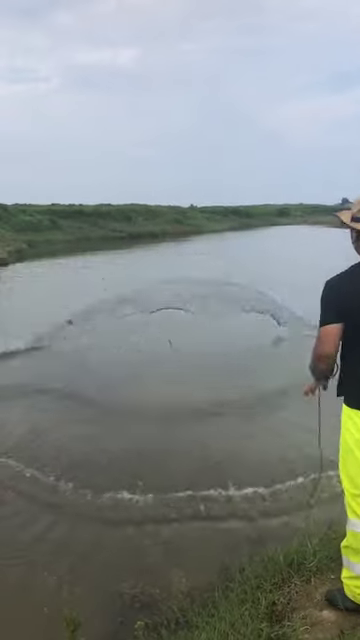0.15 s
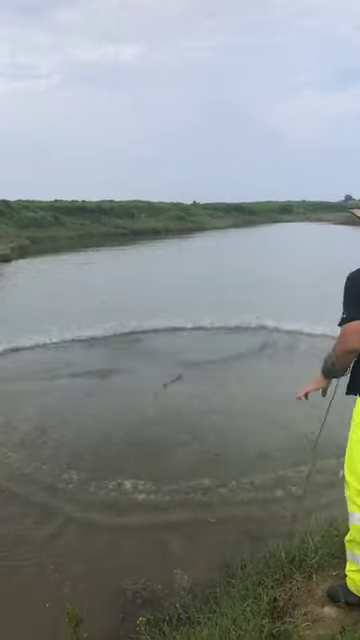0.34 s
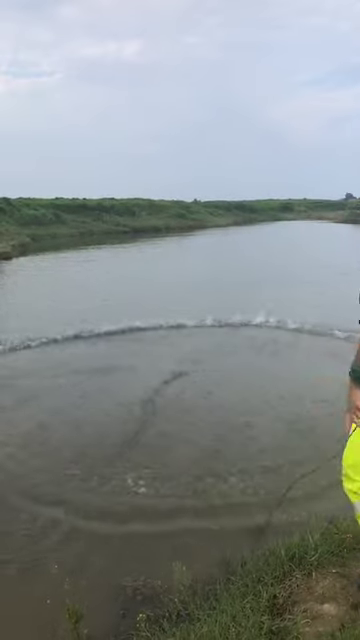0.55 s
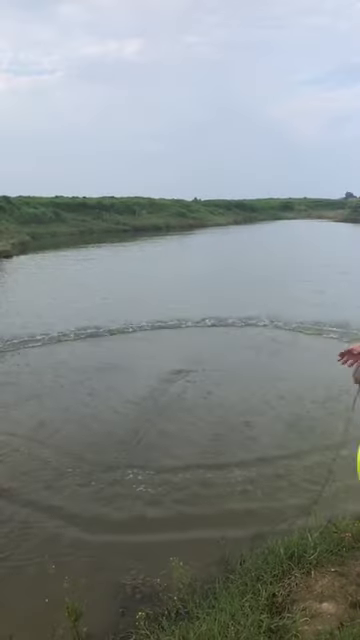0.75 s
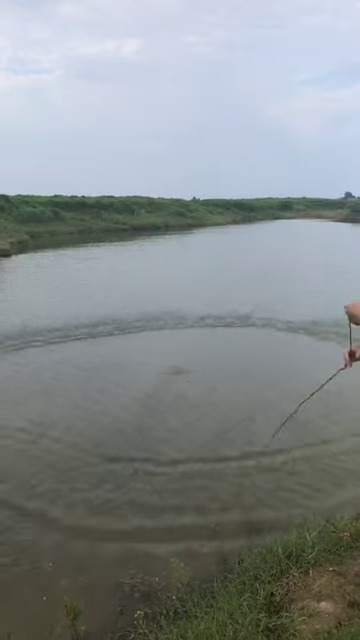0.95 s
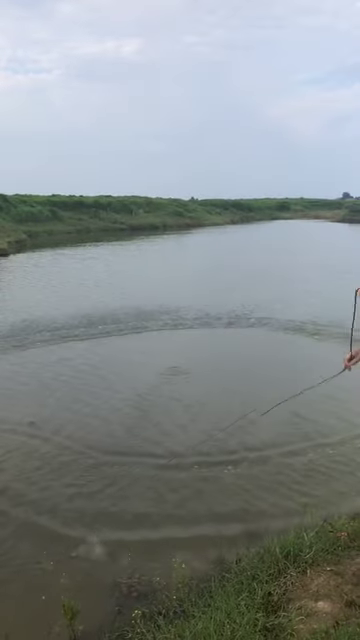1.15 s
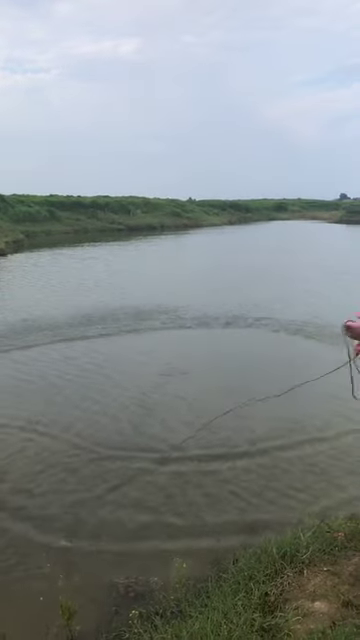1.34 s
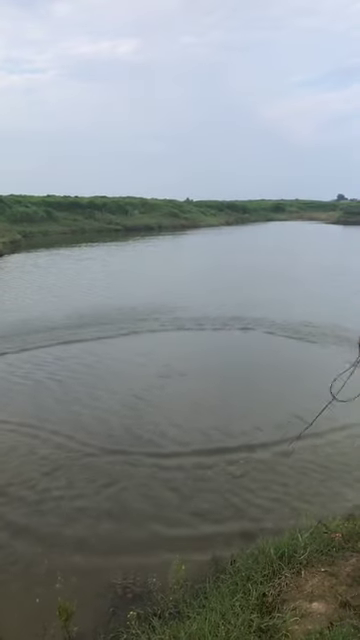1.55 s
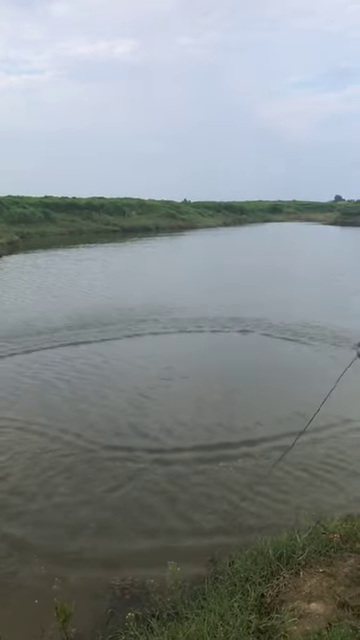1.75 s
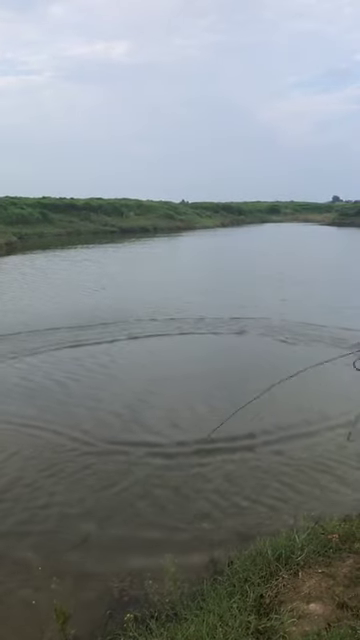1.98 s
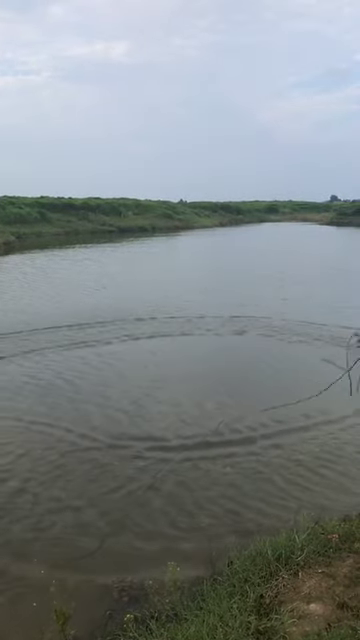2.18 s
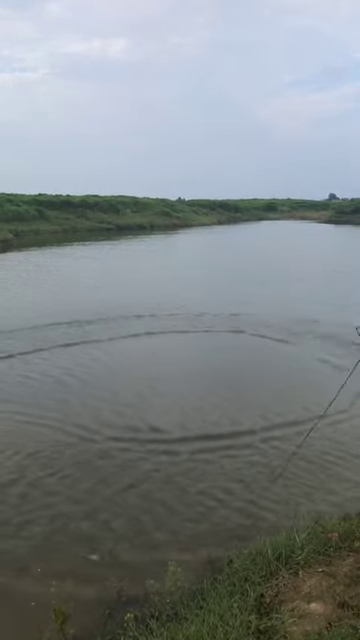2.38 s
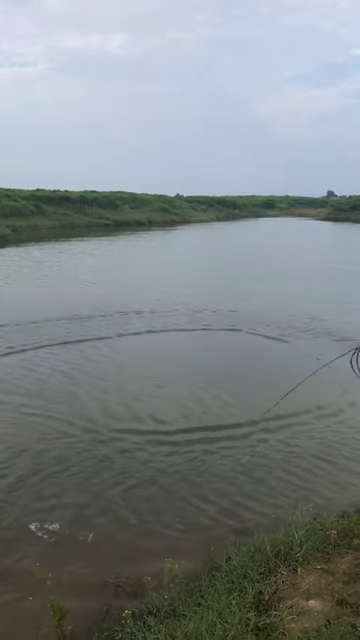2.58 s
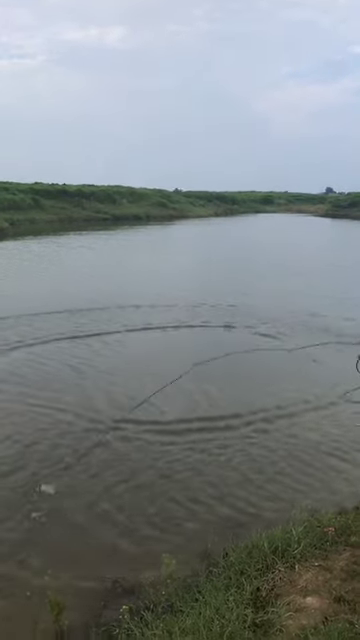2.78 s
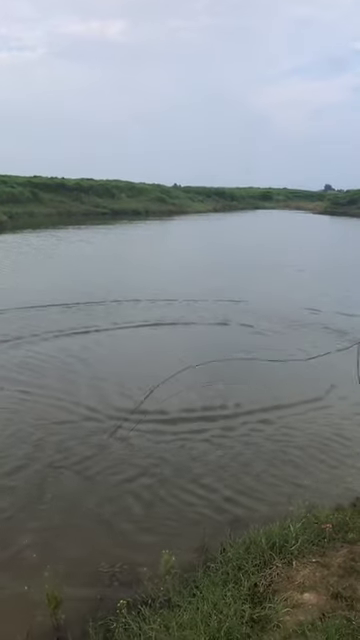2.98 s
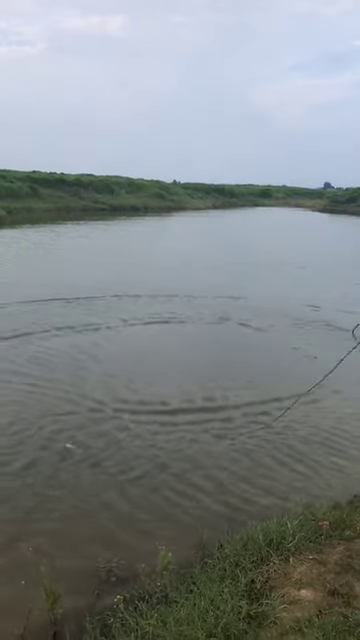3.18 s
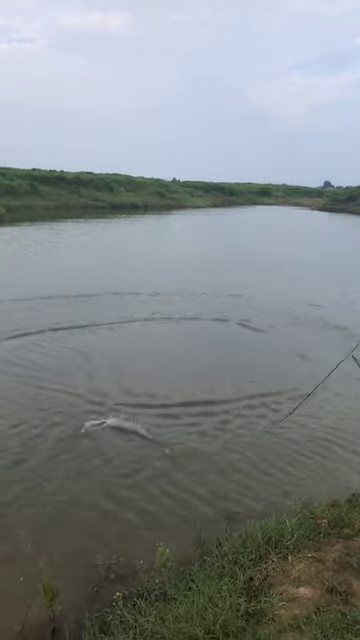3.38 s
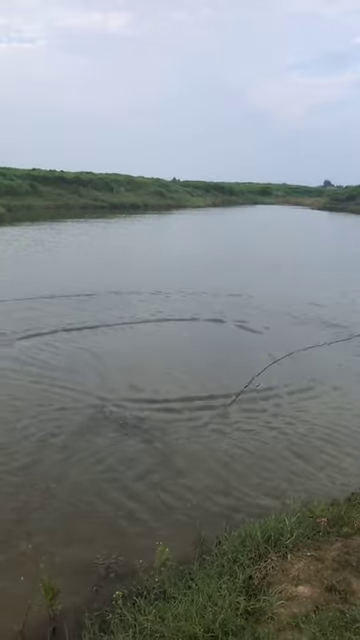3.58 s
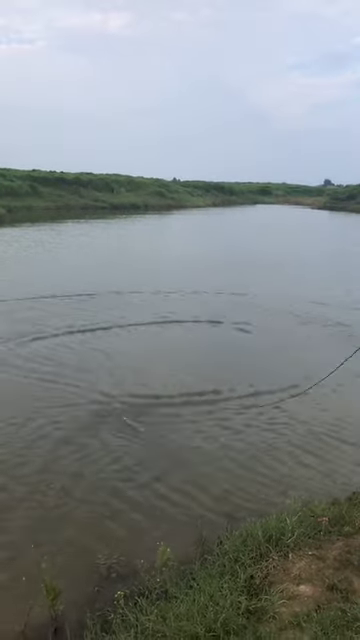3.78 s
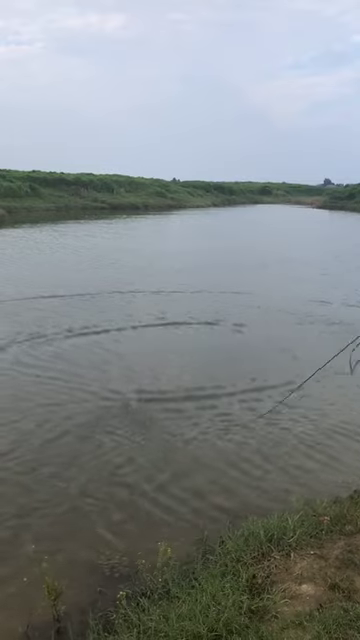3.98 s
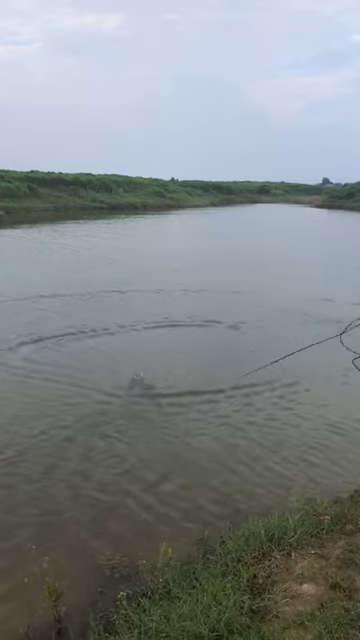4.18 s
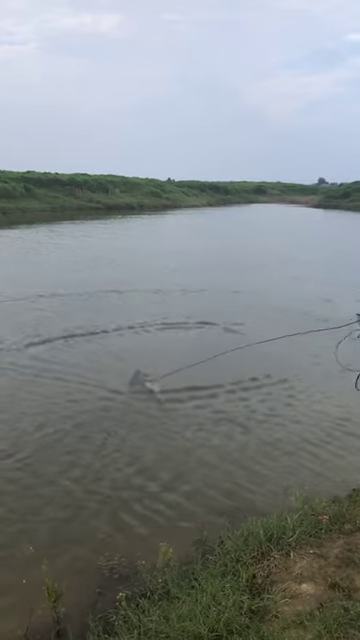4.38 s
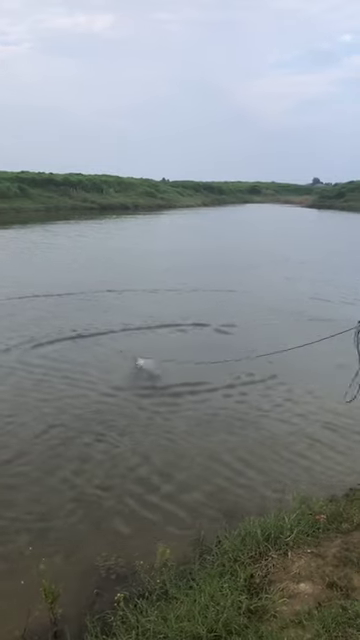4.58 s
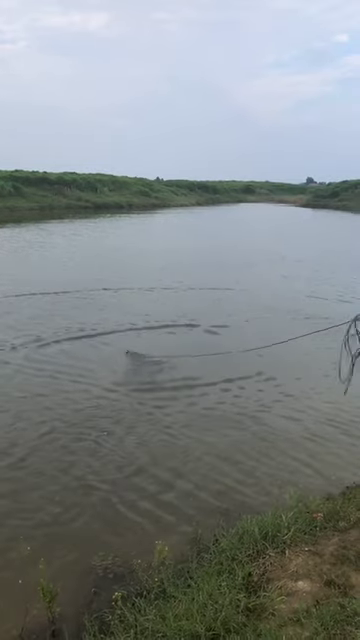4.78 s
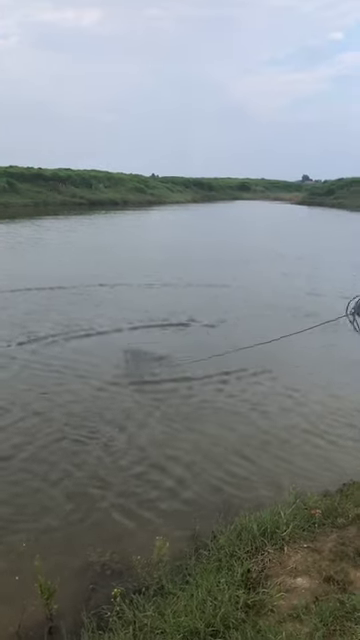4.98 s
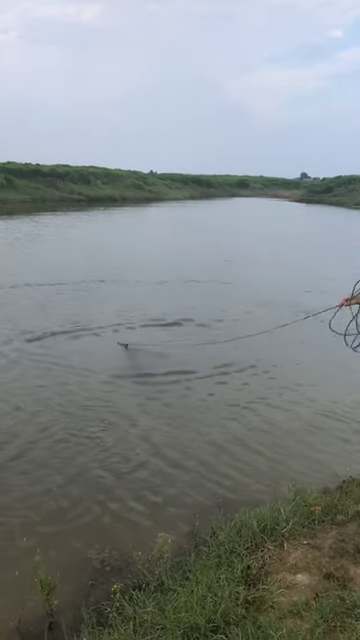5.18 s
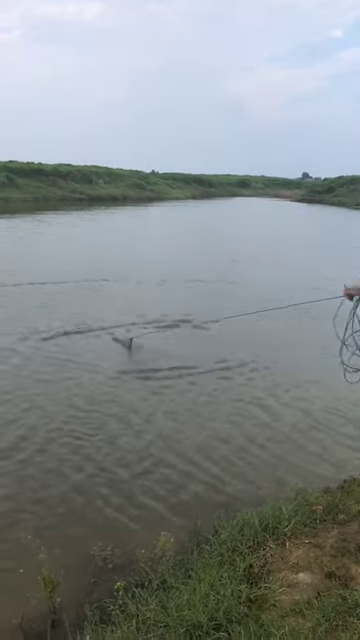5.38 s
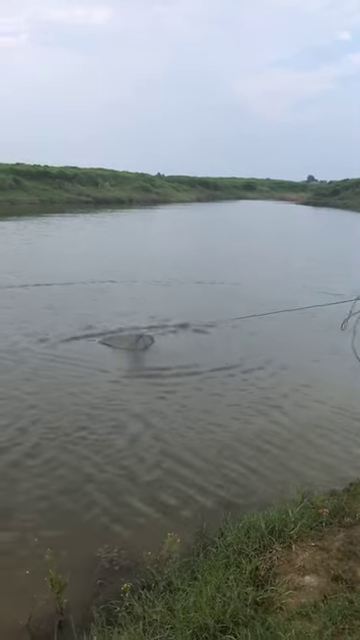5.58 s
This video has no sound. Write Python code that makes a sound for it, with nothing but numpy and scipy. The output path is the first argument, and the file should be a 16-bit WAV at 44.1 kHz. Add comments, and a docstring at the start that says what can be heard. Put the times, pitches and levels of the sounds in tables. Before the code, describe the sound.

Close on a pond bank, a weighted net lands at once with a loud, ragged splash of low gulps and hissing spray. Droplets patter back and fade within about a second and a half. Then the wet line is hauled in with brief swishes, slaps and rising drip plinks, and a small metal part clinks near the end. A bird chips, a cricket trills, and light wind buffets the microphone.

```python
"""A weighted cast net smacks onto a pond: its sinkers drag air under in gulps, and spray hisses and patters back.
The hand line is then hauled in, swishing, slapping and dripping, and a small metal part clinks once.
A bird chips, a cricket trills on the bank, and a light wind buffets the microphone throughout.
Water is made of decaying bubble tones and coloured noise, metal of damped modes, the bird and the
cricket of gliding sines, and wind of low noise with single eddies."""
import sys
import numpy as np
from scipy import signal
from scipy.fft import rfft, irfft, next_fast_len
from scipy.io import wavfile
from scipy.ndimage import map_coordinates

SR = 44100
rng = np.random.default_rng(int(sys.argv[2]) if len(sys.argv) > 2 else 0)


def write(x):
    x = np.atleast_2d(x).T
    wavfile.write(sys.argv[1], SR, np.round(np.clip(x, -1, 1) * 32767).astype(np.int16))


N = 248525

# All table levels are relative: each layer has a gain of its own.
# bunches of sinkers that smack in and gulp air: t/s, level/dB, starting f/Hz
SINKERS = [(.040, -6, 783), (.049, -9.5, 520), (.149, -7.5, 776), (.177, -12, 322), (.2208, -8, 703),
           (.238, -10, 365), (.283, -7.5, 850), (.329, -10.5, 370), (.368, -8.5, 462), (.389, -8.5, 520),
           (.432, -5, 690), (.444, -8, 554), (.456, -10.5, 268)]
# pulls that drag the wet line and the net's crown through the surface:
# start t/s, length t/s, wash level/dB, spray level/dB
PULLS = [(1.82, .06, -50.5, -55.5), (2.665, .05, -41.5, -48), (2.79, .13, -50.5, -56),
         (3.228, .03, -43, -50), (3.345, .06, -43, -58), (3.435, .03, -38.5, -39), (3.5, .05, -38.5, -45),
         (3.61, .06, -38, -48.5), (3.78, .02, -50, -56), (3.96, .14, -53, -57), (4.235, .08, -44.5, -50.5),
         (4.66, .09, -45.5, -63), (4.85, .08, -45.5, -52.5), (5.14, .1, -47, -65), (5.54, .04, -50, -54)]
# spectrum of trickling water: f/Hz, level/dB
TRICKLE_TONE = [(300, -20), (600, -4.5), (1500, -1), (2700, -0.5), (5000, -3), (7000, -10), (10000, -19)]


def splash():
    """Air-cavity resonance: sinkers drag air under in low gulps; spray falls back as small bubbles and mist."""
    # spectra of the churn, the drops and the mist: f/Hz, level/dB
    plunge_tone = [(150, -32), (215, -10), (270, 1), (400, -2), (700, -2.5), (1000, -10.5), (1600, -28),
                   (3000, -60)]
    drop_tone = [(200, -20), (350, -8), (550, -2.5), (750, 2.5), (1200, -2), (1700, -3), (2200, -6),
                 (4000, -10.5), (5500, -16.5), (9000, -40)]
    mist_tone = [(2000, -19), (4000, -1.5), (5500, -1.5), (8000, -5), (9500, -7), (12000, -7),
                 (15500, -4.5)]
    churn_level, drop_level, mist_level = splash_levels()

    pockets = froth(rate=600, low_hz=252.4, high_hz=1200, cycles=20, glide=-0.046, spread_db=1.5,
                    size=2 * SR // 3)
    churn = coloured(pockets, plunge_tone)

    small = froth(rate=2800, low_hz=1204, high_hz=7040, cycles=18, glide=0.15, spread_db=2.5,
                  size=3 * SR // 2)
    large = froth(rate=450, low_hz=378, high_hz=1407, cycles=30.3, glide=0.26, spread_db=1.5, size=SR)
    patter = coloured(small + 0.39 * large + 0.86 * rng.standard_normal(N), drop_tone)

    beads = froth(rate=4000, low_hz=3000, high_hz=15300, cycles=5.8, glide=0.1, spread_db=3.0, size=2 * SR)
    hiss = coloured(beads + 0.89 * rng.standard_normal(N), mist_tone)

    gulps = np.zeros(N)
    t = np.arange(SR // 8) / SR
    for s, db, hz in SINKERS:
        add(gulps, s, amp(db) * bubble(t, hz, cycles=30.7, glide=-0.11, onset=0.88))
    smacks = bursts(smack_rows(), drop_tone, t60=0.025, attack=0.0003)

    water = churn_level * churn + drop_level * patter + mist_level * hiss
    return water + amp(3.5) * gulps + amp(-7) * smacks


def splash_levels():
    """Growth and decay of churn, drops and mist: the landing builds, its spray falls back, the foam dies away."""
    landed_s, mesh_s = 0.445, 0.365  # the main landing ends; the mesh hits the water
    fallback_s, fallback_end_s = 0.65, 0.96
    foam_flicker_db = 1.6  # foam bursts in uneven clusters
    bunches = surges(smack_rows(), t60=0.11, attack=0.004)
    landing = held(0, landed_s, rise_db_per_s=0, fall_db_per_s=260, drift_db_per_s=8)
    thrown = held(0, landed_s, rise_db_per_s=0, fall_db_per_s=75, drift_db_per_s=8)
    fallback = held(fallback_s, fallback_end_s, rise_db_per_s=40, fall_db_per_s=66, drift_db_per_s=-15)
    foam = held(fallback_end_s, 1.5, rise_db_per_s=100, fall_db_per_s=80, drift_db_per_s=-6)
    foam = foam * amp(foam_flicker_db * wobble(35))
    mesh = swell(mesh_s, 0.05)
    fine_thrown = held(0.14, mesh_s, rise_db_per_s=24, fall_db_per_s=40, drift_db_per_s=-2)
    fine_fallback = held(fallback_s, fallback_end_s, rise_db_per_s=90, fall_db_per_s=120,
                         drift_db_per_s=-19)

    churn = amp(-23) * landing + amp(-17.5) * bunches
    # the parts of drops and of mist add by power
    drop_parts = [amp(-22.5) * thrown, amp(-13.5) * bunches, amp(-22.7) * fallback, amp(-45) * foam]
    mist_parts = [amp(-26.5) * fine_thrown, amp(-20.5) * mesh, amp(-30.5) * fine_fallback, amp(-43.5) * foam]
    return churn, np.linalg.norm(drop_parts, axis=0), np.linalg.norm(mist_parts, axis=0)


def smack_rows(reference_hz=700, db_per_octave=4):
    """Impact strength as rows (t/s, level/dB): a tighter bunch gulps higher and smacks harder."""
    return [(s, db + db_per_octave * np.log2(hz / reference_hz)) for s, db, hz in SINKERS]


def hand_line():
    """Surface entrainment: pulls wash up small bubbles and spray over lapping ripples; the coiled rope slaps."""
    # ripples lapping along the bank: t/s, level/dB
    lapping_rows = [(1.1, -44), (1.6, -51), (1.97, -45), (2.45, -53), (3.0, -50), (3.6, -47), (3.9, -51),
                    (4.45, -53), (5.05, -48.5), (5.64, -49)]
    # slaps of the rope as it is coiled: t/s, level/dB
    slap_rows = [(3.0873, -29), (3.0905, -16), (3.0935, -24), (3.844, -23), (3.848, -29), (4.205, -41),
                 (4.792, -25.5), (5.318, -24.5)]
    # spectra of a slap and of the fine spray: f/Hz, level/dB
    slap_tone = [(150, -21), (350, -4.5), (900, -4), (1450, -1), (2000, -7), (2800, -4.5), (4000, -14),
                 (8000, -21.5), (15000, -30)]
    fizz_tone = [(3000, -6), (6000, 0), (9000, -1.5), (12000, 0.5), (15500, 1)]

    lapping, = gains(lapping_rows)
    wash, spray = np.zeros((2, N))
    for start, length, wash_db, spray_db in PULLS:
        drag = held(start, start + length, rise_db_per_s=380, fall_db_per_s=230)
        wash = np.maximum(wash, amp(wash_db) * drag)
        spray = np.maximum(spray, amp(spray_db) * drag)

    plinks = froth(rate=170, low_hz=1202, high_hz=6030, cycles=51, glide=0.2, spread_db=4)
    trickle = froth(rate=700, low_hz=696, high_hz=6500, cycles=20, glide=0.26, spread_db=3.5)
    water = coloured(trickle + 0.82 * plinks + 1.1 * rng.standard_normal(N), TRICKLE_TONE)
    ripples = coloured(trickle + 0.3 * plinks + 2.35 * rng.standard_normal(N), TRICKLE_TONE)
    beads = froth(rate=600, low_hz=4000, high_hz=15000, cycles=22, glide=0.1, spread_db=4)
    fizz = coloured(beads + 1.16 * rng.standard_normal(N), fizz_tone)

    sputter = amp(2.4 * wobble(100))
    pulled = sputter * (amp(-2.5) * wash * water + amp(1.5) * spray * fizz)
    slaps = bursts(slap_rows, slap_tone, t60=0.019, attack=0.00085)
    return pulled + amp(-3.7) * lapping * ripples + amp(-1.5) * slaps


def drips():
    """Bubble resonance: a drop ticks and traps a bubble of rising pitch; one large pocket gurgles upward."""
    # single distinct drops off the line: t/s, level/dB, starting f/Hz
    single_drops = [(1.117, -27, 780), (1.162, -28, 1290), (1.823, -32, 810), (2.652, -23.5, 1700),
                    (2.710, -17, 2040), (2.795, -23, 1330), (2.841, -24.5, 3760), (2.930, -25, 1900),
                    (3.336, -28, 1550), (3.383, -27, 2500), (3.481, -22, 3490), (3.509, -17.5, 3680),
                    (3.545, -22, 2530), (3.603, -23, 3150), (3.623, -20.5, 2140), (3.652, -23, 1440),
                    (3.683, -23.5, 3540), (3.974, -26.5, 2630), (4.055, -31, 5160), (4.241, -21.5, 3650),
                    (4.287, -23, 5400), (4.324, -25, 2570), (4.640, -23.5, 2460), (4.733, -26, 2380),
                    (4.865, -25, 2600), (4.931, -22.5, 3200)]
    out = np.zeros(N)
    t = np.arange(SR // 10) / SR
    drops = single_drops + small_drops()
    for s, db, hz in drops:
        add(out, s, amp(db) * bubble(t, hz, cycles=40, glide=0.24, onset=1.74))

    # the pocket wobbles, and its pitch climbs ever faster as it nears the surface
    rise = np.linspace(0, 1, num=SR // 14)
    pitch = 620 + 1400 * rise ** 2 + 70 * wobble(347)[:len(rise)]
    arch = np.sqrt(np.sin(np.pi * rise).clip(0))
    level = amp(-35.5 - 7 * rise + 3.3 * wobble(200)[:len(rise)]) * arch
    add(out, 3.648, level * np.sin(2 * np.pi * np.cumsum(pitch) / SR))

    ticks = bursts(drops, TRICKLE_TONE, t60=0.034, attack=0.001)
    return amp(4.0) * out + amp(-15) * ticks


def small_drops():
    """Random shedding as rows (t/s, level/dB, f/Hz): a pull with a louder wash sheds louder drops."""
    drips_per_s, after_s = 70, 0.03  # shed during each drag and for a moment after it
    centre_hz, spread_octaves = 2900, 0.65
    over_wash_db, scatter_db = 11, 1.5
    rows = []
    for start, length, wash_db, _ in PULLS:
        span = length + after_s
        when = rng.random(size=64)
        strength, size = rng.standard_normal(size=64), rng.standard_normal(size=64)
        db = wash_db + over_wash_db + scatter_db * strength
        hz = centre_hz * 2 ** (spread_octaves * np.clip(size, -2, 1))
        rows += list(zip(start + span * when, db, hz))[:round(drips_per_s * span)]
    return rows


def clink():
    """Modal vibration: a small metal part is struck, rings in damped modes and rattles to rest."""
    # modes of the part: f/Hz, level/dB, 60 dB decay t/s
    modes = [(2400, -18, 0.04), (4592, -24, 0.1), (7120, -0.5, 0.06), (7542, -15, 0.07), (9868, -19, 0.01),
             (15130, -19, .06)]
    # its contacts: t/s, ring level/dB, click level/dB
    contacts = [(5.343, -15, -17), (5.3555, -33, -25), (5.360, -36, -28), (5.368, -31, -26),
                (5.3717, -42.5, -33)]
    # spectrum of the rattle: f/Hz, level/dB
    rattle_tone = [(500, -20), (1400, -6), (2300, 2), (3500, -10), (4700, -3), (7000, -1), (8500, -1),
                   (9800, 3.5), (11200, -6), (13200, -7), (15400, 5.5)]
    out = np.zeros(N)
    t = np.arange(SR // 5) / SR
    ring = sum(amp(db - 60 * t / t60) * np.sin(2 * np.pi * hz * t) for hz, db, t60 in modes)
    for s, ring_db, _ in contacts:
        add(out, s, amp(ring_db) * ring * (1 - np.exp(-t / 0.0014)))
    clicks = [(s, click_db) for s, _, click_db in contacts]
    rattle = bursts(clicks, rattle_tone, t60=0.04, attack=0.0004)
    return amp(2.5) * out + amp(0.5) * rattle


def birds():
    """Frequency modulation: one bird repeats a sharp upward chip; a far one whistles once."""
    # chips: t/s, level/dB
    chip_rows = [(1.1465, -29), (1.359, -23.5), (1.834, -25.5), (2.0484, -27), (2.4543, -25),
                 (2.665, -28.5), (3.075, -26), (3.297, -24), (3.753, -25), (3.969, -24.5), (4.3732, -23.5),
                 (4.596, -20.5), (4.937, -27.5), (5.147, -25.5), (5.557, -22)]
    # contours of the two calls: t/s, f/Hz, level/dB
    chip = [(0, 5200, -18), (.001, 7530, -2), (.003, 7180, -4), (.005, 7850, -2), (.009, 8300, -9),
            (.013, 8950, -24.5), (.016, 9000, -47.5)]
    whistle = [(0, 3700, -15), (.02, 4050, 0), (.045, 4400, 1), (.065, 4480, -3), (.08, 4350, -22)]
    out = np.zeros(N)

    def note(shape, rough):
        """A sine follows the contour, with an unsteady pitch and level."""
        s, hz, db = np.transpose(shape)
        t = np.arange(0, s[-1], 1 / SR)
        quaver = rough * np.interp(t, np.linspace(0, s[-1], num=14), rng.standard_normal(size=14))
        pitch = np.interp(t, s, hz) * (rng.normal(1, 0.012) + 0.026 * quaver)
        return amp(np.interp(t, s, db) + 2.2 * quaver) * np.sin(2 * np.pi * np.cumsum(pitch) / SR)

    for s, db in chip_rows:
        add(out, s, amp(db) * note(chip, rough=1))
    add(out, 2.185, amp(-47) * note(whistle, rough=0.25))
    return out


def insects(stroke_hz=29.8, pitch_hz=6380):
    """Stridulation: each wing stroke swells and sags in pitch; more insects shimmer far off as noise."""
    # cricket trills: start t/s, end t/s, level/dB
    trill_rows = [(1.38, 2.21, -55), (2.43, 3.15, -56.5), (3.42, 4.93, -52), (5.085, 5.19, -52),
                  (5.47, 5.57, -52)]
    # spectrum of the far insects: f/Hz, level/dB
    insect_tone = [(4000, -28), (5800, -10), (6700, -1), (7150, -5.5), (7650, -4), (8200, -13), (9500, -28)]
    t = np.arange(N) / SR
    stroke = (t * stroke_hz + 0.15 * wobble(3)) % 1  # position within the stroke, 0 to 1
    pitch = pitch_hz * (1 - 0.055 * (stroke - 0.5) + 0.0202 * wobble(1200))
    level = sum(amp(db) * np.clip(np.minimum(t - start, end - t) / 0.0092, 0, 1)
                for start, end, db in trill_rows)
    strokes = amp(1.9 * wobble(20)) * np.sin(np.pi * stroke) ** 2
    trill = level * unit(strokes * np.sin(2 * np.pi * np.cumsum(pitch) / SR))
    shimmer = amp(-57.5 + 1.7 * wobble(2) + 2.1 * wobble(60)) * noise(insect_tone)
    return amp(-3.5 + wobble(4.16)) * trill + shimmer


def wind():
    """Turbulent pressure: lumpy buffeting swells in gusts around single eddies, over the soft rush of open air."""
    # breeze on the microphone: t/s, level/dB
    breeze_rows = [(0.0, -40), (0.67, -42), (1.21, -40), (1.33, -37), (1.9, -36), (2.65, -38), (2.86, -43),
                   (3.04, -43), (3.37, -41), (3.97, -43), (4.25, -38), (4.6, -42), (5.51, -42), (5.64, -41)]
    # short gusts with an eddy at the heart of each: t/s, eddy level/dB, eddy f/Hz
    gust_rows = [(.561, -26, 90), (1.246, -24.5, 89), (1.456, -21, 70), (1.626, -20, 65), (2.421, -23, 100),
                 (2.509, -20.5, 71), (3.286, -20, 150), (3.354, -18, 65), (3.55, -26, 70), (3.70, -26, 70),
                 (4.346, -25, 65), (4.887, -20, 120), (5.431, -19.5, 109)]
    # spectra of the buffeting and of the open air: f/Hz, level/dB
    wind_tone = [(20, -34), (32, -13.5), (48, 0), (75, -1.5), (110, -5.5), (170, -12), (260, -19),
                 (500, -29.5), (1200, -39.5), (4000, -80)]
    air_tone = [(100, -10), (300, 0.5), (600, -3), (1200, -5.5), (2500, -17.5), (5000, -16.5), (10000, -17),
                (15500, -17)]
    gust_s, gust_under_eddy_db = 0.085, -10
    breeze, = gains(breeze_rows)
    buffet = amp(2) * breeze
    eddies = np.zeros(N)
    t = np.arange(SR // 10) / SR - 0.05  # time from the middle of the eddy
    for s, db, hz in gust_rows:
        buffet = np.maximum(buffet, amp(db + gust_under_eddy_db) * swell(s, gust_s))
        add(eddies, s + t[0], -amp(db) * np.sin(2 * np.pi * hz * t) * np.exp(-(t * hz / 0.7) ** 2))
    rumble = buffet * unit(amp(1.4 * wobble(22.02)) * noise(wind_tone))
    air = amp(-49.5 + 0.43 * wobble(1.75)) * noise(air_tone)
    return rumble + eddies + air


def banks(x, t60=0.17):
    """Diffuse scattering: the grassy banks return a faint short tail, as convolution with decaying noise."""
    t = np.arange(SR // 3) / SR
    tail = rng.standard_normal(len(t)) * amp(-60 * t / t60) * (1 - np.exp(-t / 0.005))
    return signal.fftconvolve(x, tail / np.linalg.norm(tail))[:N]


def bubble(t, hz, cycles, glide, onset):
    """Damped resonance: an air pocket falls 60 dB in so many cycles, gliding in pitch, after a swell of onset cycles."""
    age = t * hz / cycles
    tone = np.sin(2 * np.pi * hz * t * (1 + glide * age / 2))
    return tone * np.exp(-np.log(1000) * age) * (1 - np.exp(-t * hz / onset))


def froth(rate, low_hz, high_hz, cycles, glide, spread_db, size=N):
    """Superposition: a steady swarm of random bubbles, rate a second, size samples long and then repeated."""
    when, pitch, chance, lag = rng.random((int(rate * size / SR), 4), dtype=np.float32).T
    hz = low_hz * (high_hz / low_hz) ** pitch
    steps = np.arange(int(cycles * SR / low_hz / 2))
    # small bubbles are brief but sharp
    strength = amp(-spread_db * np.log(np.clip(chance, 0.02, 1))) * hz / low_hz
    t = (steps.astype(np.float32) + lag[:, None]) / SR
    rings = strength[:, None] * bubble(t, hz[:, None], cycles, glide, onset=0.45)
    at = (when * size).astype(int)[:, None] + steps
    swarm = np.bincount(at.ravel(), rings.ravel(), size)[:size]
    return np.resize(unit(swarm), N)


def bursts(rows, tone, t60, attack):
    """Impact noise: short decaying puffs of coloured noise at rows (t/s, level/dB)."""
    return surges(rows, t60, attack) * noise(tone)


def surges(rows, t60, attack):
    """Exponential decay: a gain that jumps and dies away at each row (t/s, level/dB)."""
    level = np.zeros(N)
    t = np.arange(SR // 4) / SR
    for s, db, *_ in rows:
        add(level, s, amp(db - 60 * t / t60) * (1 - np.exp(-t / attack)))
    return level


def held(start, end, rise_db_per_s, fall_db_per_s, drift_db_per_s=0):
    """Linear decibel slopes: a gain that rises to 1 at start, drifts until end and then falls."""
    t = np.arange(N) / SR
    drift = drift_db_per_s * (np.clip(t, start, end) - start)
    rise = rise_db_per_s * np.maximum(start - t, 0)
    fall = fall_db_per_s * np.maximum(t - end, 0)
    return amp(np.maximum(drift - rise - fall, -120))


def swell(middle, length):
    """Smooth envelope: a round-topped gain of 1 at its middle, length seconds wide at half gain."""
    return 1 / (1 + np.square(np.square(2 * (np.arange(N) / SR - middle) / length)))


def gains(rows):
    """Decibel interpolation: one gain per sample for each level column, silent outside the rows."""
    s, *cols = np.transpose(rows)
    t = np.arange(N) / SR
    gate = np.clip(np.minimum(t - s[0], s[-1] - t) / 0.026 + 1, 0, 1)
    return [gate * amp(np.interp(t, s, c)) for c in cols]


def wobble(rate):
    """Slow random modulation: a smooth curve through rate random knots a second."""
    return map_coordinates(rng.standard_normal(int(N * rate / SR) + 4), [np.arange(N) * rate / SR])


def noise(tone):
    """Spectral shaping of white noise, at rms 1."""
    return coloured(rng.standard_normal(N), tone)


def coloured(x, tone):
    """Spectral shaping: x filtered by (f/Hz, level/dB) points, at rms 1."""
    f, db = np.transpose(tone)
    return unit(filtered(x, lambda hz: amp(np.interp(np.log(hz + 1), np.log(f), db))))


def filtered(x, response):
    """Linear filtering: the spectrum of x times a response of frequency."""
    m = next_fast_len(N + 8192)  # padded so that the filter's ringing does not wrap onto the start
    return irfft(rfft(x, m) * response(np.fft.rfftfreq(m, 1 / SR)), m)[:N]


def amp(db):
    """Logarithmic level: decibels to gain."""
    return 10 ** (np.asarray(db) / 20)


def unit(x):
    """Power normalization: scale to rms 1."""
    return x / np.sqrt(np.mean(x ** 2) + 1e-20)


def add(track, s, sound):
    """Superposition: mix a sound into the track at s seconds."""
    part = track[max(round(s * SR), 0):][:len(sound)]
    part += sound[:len(part)]


def scene():
    """Superposition of all sources at one microphone on the shore."""
    near = drips() + clink()
    calls = birds()
    scattered = banks(amp(-14) * near + amp(-19) * calls)
    mix = splash() + hand_line() + near + calls + scattered + insects() + wind()
    return mix[None]


def record(dry):
    """Saturation and band limiting: the recorder rounds the highest peaks and keeps nothing above its limit."""
    top_hz = 15850
    rounded = dry[0] / (1 + np.abs(dry[0] / 0.95) ** 6) ** (1 / 6)
    return filtered(rounded, lambda hz: hz < top_hz)[None]


dry = scene()
out = record(dry)
write(out)
```